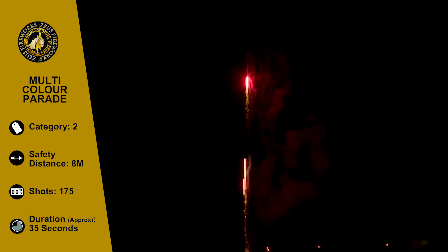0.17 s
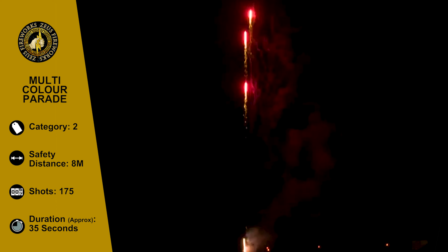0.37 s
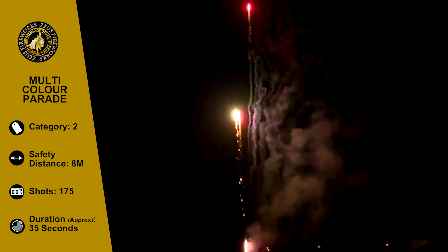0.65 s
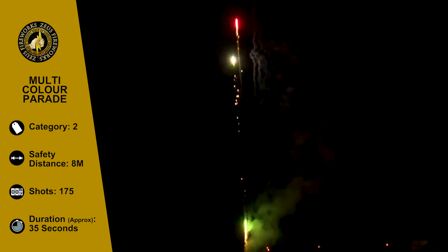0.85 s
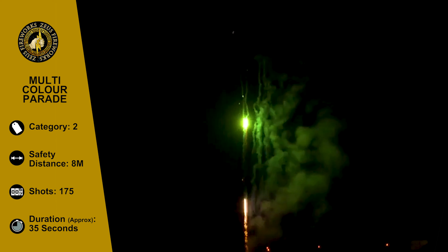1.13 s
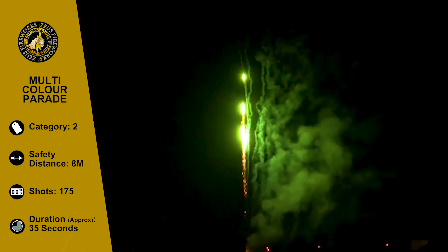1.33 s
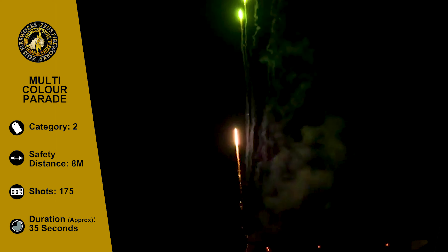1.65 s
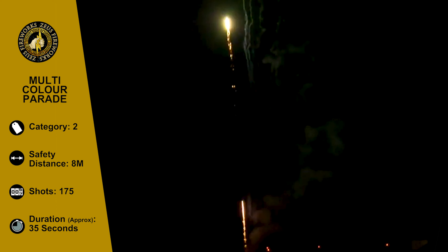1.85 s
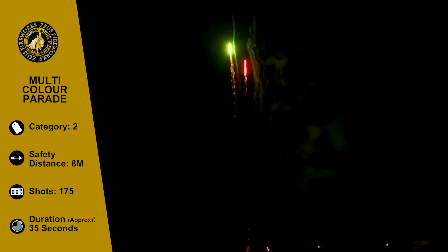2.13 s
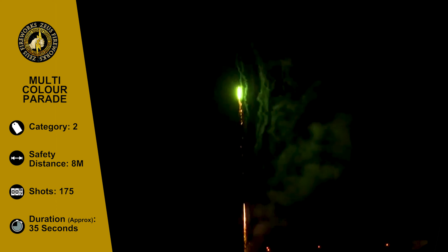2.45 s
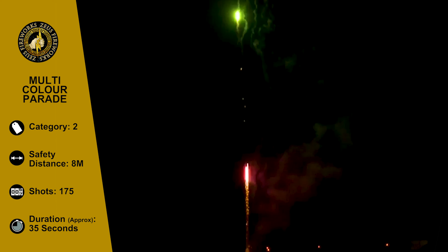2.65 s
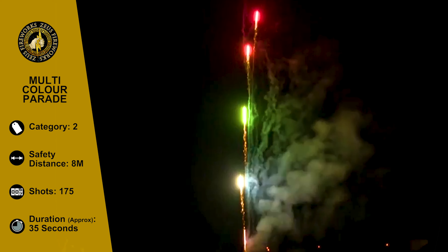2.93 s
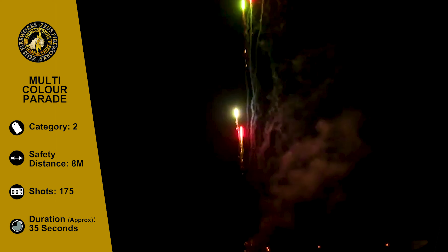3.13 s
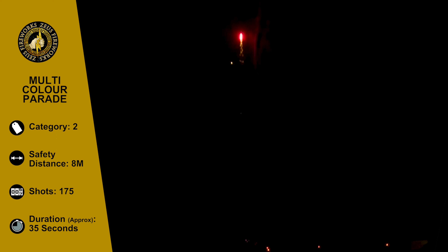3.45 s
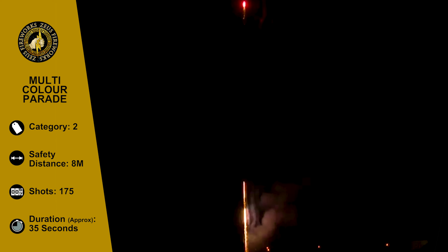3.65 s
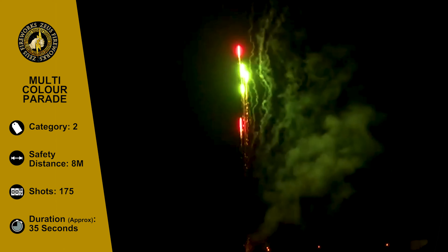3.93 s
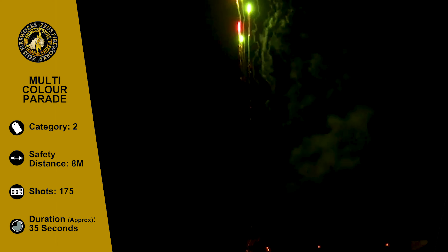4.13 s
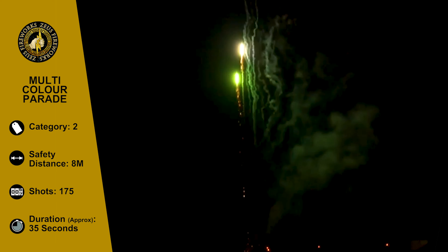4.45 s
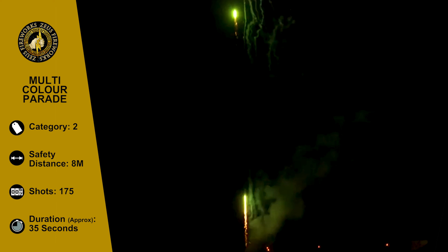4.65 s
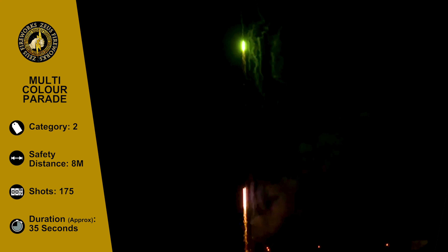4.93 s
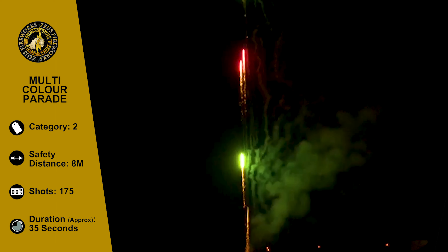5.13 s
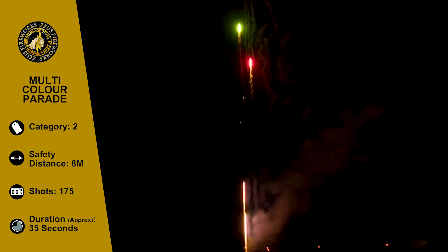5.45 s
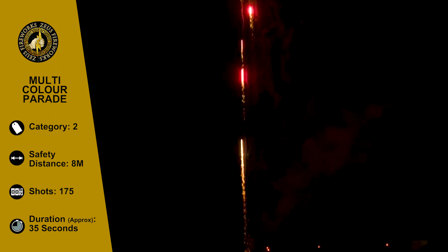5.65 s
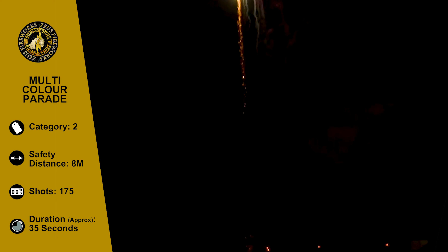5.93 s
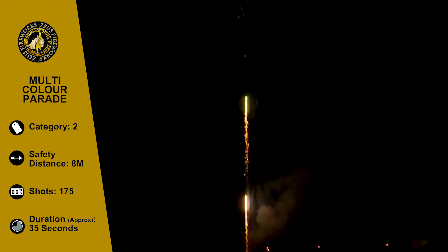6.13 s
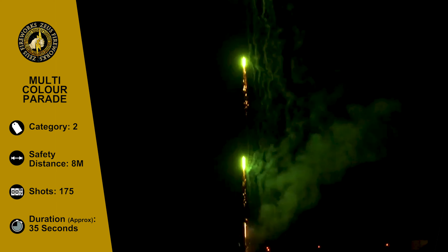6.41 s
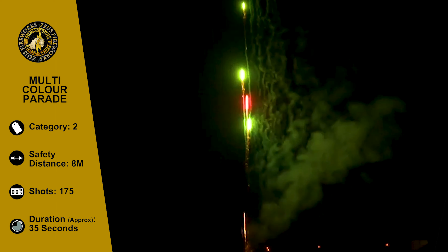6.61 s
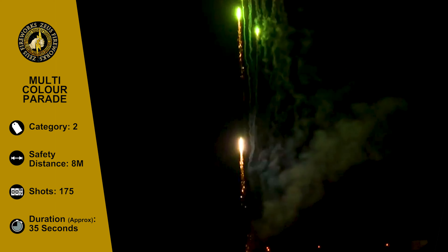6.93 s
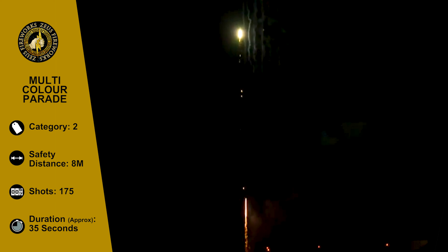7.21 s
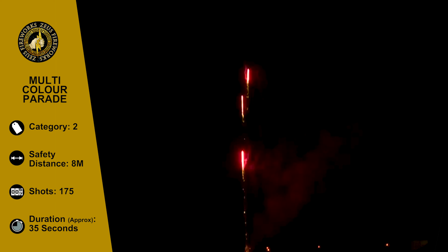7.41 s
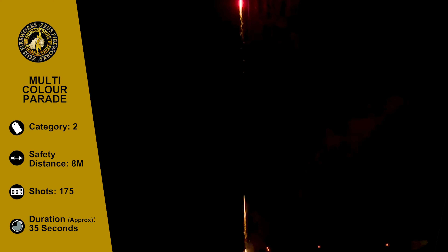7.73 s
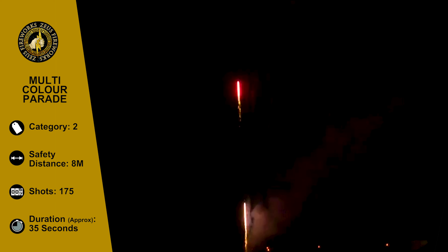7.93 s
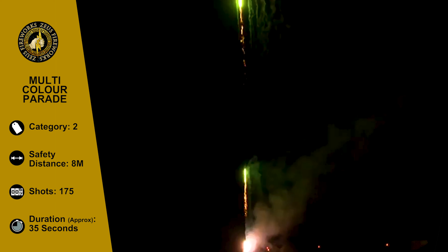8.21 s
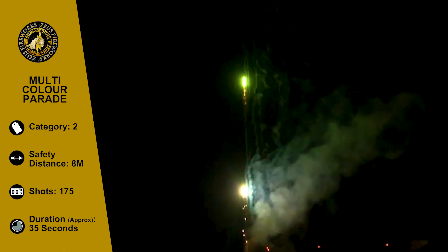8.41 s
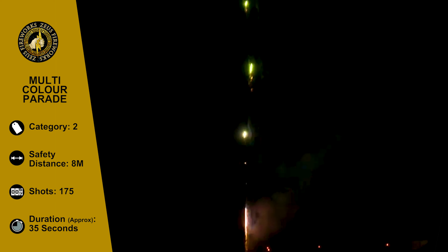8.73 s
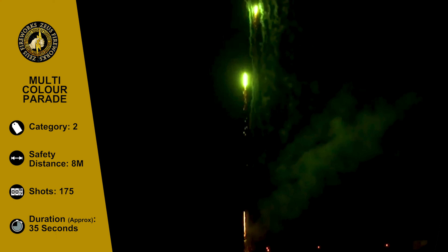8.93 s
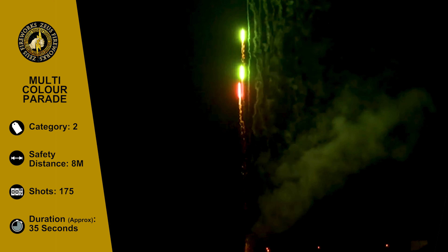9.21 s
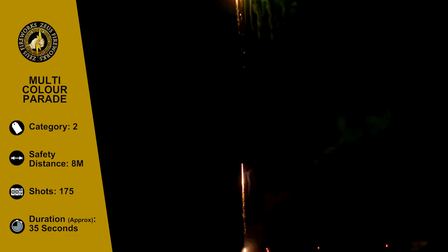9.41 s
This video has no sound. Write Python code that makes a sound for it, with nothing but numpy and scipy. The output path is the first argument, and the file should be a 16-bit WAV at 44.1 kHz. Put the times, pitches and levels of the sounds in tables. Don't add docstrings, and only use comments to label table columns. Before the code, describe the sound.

A bundle of roman candles fires some metres away in an open field at night. Sharp, dry pops come unevenly, singly, in pairs and in tight flurries, each with a split-second hiss of gas, a small low thump and a short hollow tube ring. Bright sparks sizzle after each shot while hedges and ground return a soft wash. Faint distant rumble and thin hiss lie beneath. Clear stereo, centred shots, wide echoes.

```python
import sys
import numpy as np
from scipy import signal
from scipy.fft import rfft, irfft, next_fast_len
from scipy.io import wavfile
from scipy.ndimage import uniform_filter1d, map_coordinates

SR = 44100
rng = np.random.default_rng(int(sys.argv[2]) if len(sys.argv) > 2 else 0)


def put_to_file(sound):
    columns = np.atleast_2d(sound).T
    safe = np.clip(columns, -1, 1)
    whole_steps = np.round(safe * 32767)
    wavfile.write(sys.argv[1], SR, whole_steps.astype(np.int16))


def nominal_scale(level):
    x = np.asarray(level, float) / 20
    return 10 ** x


N = 421596
LEAD = SR // 20

# pitch_hz, likeness (0-1)
NEAR = [(60, .998), (1500, .996), (4000, .96), (8000, .92), (14000, .75)]
# pitch_hz, likeness (0-1)
WIDE = [(60, .96), (200, 0.038), (550, 0.99), (1400, 0.93), (3100, 0.69), (6800, 0), (15000, 0)]


def candles():
    snaps = per_shot(snap, seconds=.06)
    jet, roar = gas_jet(), gas_roar()
    direct = snaps + per_shot(push, seconds=.07) + jet + roar + tube_ring()
    blast = .6 * roar.mean(axis=0) + .6 * snaps + .4 * jet.mean(axis=0)
    far = nominal_scale(-11) * far_echoes(blast) + scattered_sound()
    left_lag = 13e-6
    sides = np.array([[-1], [1]])
    placed = filtered(direct, lambda hz: np.exp(1j * np.pi * hz * left_lag * sides))
    return placed + star_sparks() + far


def shots():
    # start_s (the snap), leak_ms (before the snap), snap_db (peak), gas_db
    fired_shots = [(-0.009, 5.0, -14.5, -30.5), (0.1743, 8.6, -15, -36), (0.1887, 3, -13, -30.5),
                   (0.4524, 5.2, -16.5, -36.5), (0.5706, 4, -10.0, -29.5), (0.7339, 5.8, -16.5, -36),
                   (0.8798, 8.3, -25, -40), (1.152, 5.6, -22.0, -34), (1.2615, 4.6, -14.5, -31.5),
                   (1.295, 4.5, -13.5, -31.5), (1.6247, 4.14, -6.0, -28), (1.8977, 4.1, -12, -32),
                   (1.9961, 3.7, -11.0, -31.5), (2.3092, 4.8, -11.5, -31.5), (2.504, 6.1, -13.5, -32.0),
                   (2.6296, 5.4, -14.5, -36.5), (2.6635, 5.8, -10, -32.5), (2.8745, 9.7, -24.0, -36.5),
                   (2.8903, 3.7, -8.5, -28), (3.0028, 7.9, -13.5, -38), (3.6635, 5.7, -14.5, -34),
                   (3.6908, 8.1, -19.5, -33), (3.7387, 5.4, -17.0, -31.5), (3.7773, 4.5, -13, -31),
                   (3.8699, 8.4, -15.0, -35), (4.2535, 4.8, -9.5, -29), (4.7001, 8.7, -18, -33.5),
                   (4.9834, 10.6, -7.5, -28.5),
                   (5.1018, 6.5, -15, -34.5), (5.1721, 5.1, -16.5, -32.5), (5.5017, 3.9, -11, -26.5),
                  (5.5292, 8.5, -14, -37), (5.6377, 3.3, -9, -30.5), (6.0693, 5.05, -8, -29.5),
                  (6.1626, 9.1, -20.0, -37.0), (6.3556, 3.1, -45, -33.5), (6.473, 6.8, -19, -31.5),
                  (6.5319, 3.7, -11.0, -29.5), (6.6869, 3.9, -9.5, -30.5), (6.8625, 6.4, -15.5, -38.5),
                  (7.262, 5.9, -13.0, -34.5), (7.3648, 5.6, -10.5, -32.5), (7.4019, 7.2, -15, -34.5),
                  (7.77, 8.5, -15.5, -32), (7.8456, 4.4, -11.0, -27.5), (8.006, 2.7, -7.5, -28.5),
                  (8.1916, 4.3, -30, -35.5), (8.2512, 3.8, -28, -50), (8.4315, 3, -28, -35),
                  (8.7971, 7.5, -15.5, -35.5), (9.0023, 6, -13.5, -34.5), (9.0744, 3.8, -15.5, -28.5),
                  (9.1322, 4.6, -10.5, -34.5), (9.4391, 4.3, -11.5, -27.5), (9.5181, 8.3, -14.5, -36.5)]
    start_s, leak_ms, snap_db, gas_db = np.transpose(fired_shots)
    more_db, longer_ms = gas_db + 33, leak_ms - 5.5
    push_db = -29.3 + 0.68 * more_db + 0.18 * np.maximum(snap_db + 14, -12)
    jet_db = -34.5 + 1.3 * more_db + 0.21 * longer_ms
    roar_db = -35 + 0.84 * more_db - 0.22 * longer_ms
    return np.transpose([start_s, leak_ms, snap_db, push_db, jet_db, roar_db])


def snap(ms, leak_ms, snap_db, *_):
    # delay_ms, size (ratio)
    bounces = [
        (2, 0.041),
        (4.4, 0.067),
        (6, 0.035),
        (6.9, 0.09),
        (8.7, 0.058),
        (10.2, 0.1),
        (11.4, 0.089),
        (15.4, 0.022),
        (18.3, 0.026),
    ]
    width_ms = .036 + .006 * max(0, -17 - snap_db)
    spike = lobe(ms, 0, width_ms) + .5 * lobe(ms, .19, width_ms)
    suck = 0.2 * lobe(ms, 0.066, 0.098) - 0.38 * lobe(ms, 1.348, 0.14)
    near = 0
    for delay_ms, size in bounces:
        near = near + size * (lobe(ms, delay_ms, .14) - 0.15 * lobe(ms, delay_ms + 0.96, 0.6))
    return nominal_scale(snap_db - 3.0) * (spike + suck + 1.58 * near)


def push(ms, leak_ms, snap_db, push_db, *_):
    # delay_ms, width_ms, size (ratio)
    swing = [
        (1.5, .9, -1.35),
        (5.6, 1.9, .95),
        (9, 1.5, .2),
        (15, 3.5, -.15),
    ]
    heave = 0.98 * lobe(ms, 1.1 - leak_ms, 1.0) - 0.78 * lobe(ms, -.4 * leak_ms, 0.33 * leak_ms)
    gas_left = (3.6 / np.clip(leak_ms, 3, 12)) ** 0.38
    after = sum(size * lobe(ms, delay_ms, width_ms) for delay_ms, width_ms, size in swing)
    return nominal_scale(push_db + 2.0) * (heave + gas_left * after)


def gas_jet():
    # pitch_hz, level_db (per Hz)
    jet_colour = [(1500, -28), (2600, -12.5), (4400, -4.5), (5300, -1.5), (7700, -15), (9000, -8.5),
                  (11000, -12.5), (13000, -26), (15500, -26), (16200, -60)]

    def power(ms, leak_ms, snap_db, push_db, jet_db, roar_db):
        leaking = nominal_scale(2 * (jet_db + 2.0)) * gas_power(ms, leak_ms)
        burst = nominal_scale(2 * (snap_db - 12.5)) * fade(ms, rise_ms=0.056, t60_ms=5.6)
        return leaking + burst

    return np.sqrt(per_shot(power, seconds=.08)) * rush(jet_colour, NEAR, patchy_db=1.5)


def gas_roar():
    # pitch_hz, level_db (per Hz)
    roar_colour = [(200, -27), (450, -8), (700, -1.5), (1100, -2), (1900, 1), (2600, -13), (4000, -8),
                   (6500, -14), (10000, -57)]

    def power(ms, leak_ms, snap_db, push_db, jet_db, roar_db):
        return nominal_scale(2 * roar_db) * gas_power(ms, leak_ms)

    return np.sqrt(per_shot(power, seconds=.08)) * rush(roar_colour, NEAR, patchy_db=2.0)


def gas_power(ms, leak_ms):
    since_leak = ms + leak_ms
    growth = np.clip(since_leak / 4.37, 0, 1) ** 1.58
    sag_db = 120 * np.maximum(since_leak - 4.2, 0) / 70
    open_db = 120 * np.maximum(ms - 1.8, 0) / 28
    return growth * nominal_scale(-sag_db - open_db)


def tube_ring():
    # pitch_hz, level_db (per Hz)
    tube_colour = [(120, -41), (200, 13.5), (328, 2), (1060, 9), (1710, -2), (2020, 4.5), (4040, -2.5),
                   (4860, -19), (6880, -3.5), (11500, -64), (16000, -47)]

    def power(leak_ms, snap_db, push_db, jet_db, roar_db):
        return nominal_scale(push_db + roar_db - 3.5)

    ringing = after_shots(power, delay_ms=0, rise_ms=3.6, t60_ms=76)
    return ringing * rush(tube_colour, NEAR, patchy_db=0)


def star_sparks():
    # pitch_hz, level_db (per Hz)
    spark_colour = [(1000, -34), (2500, -11), (5000, -6), (8000, -8), (11000, -15.5), (13000, -20),
                    (15600, -28), (16200, -60)]

    def power(leak_ms, snap_db, push_db, jet_db, roar_db):
        return nominal_scale(jet_db + roar_db - 47.0)

    burning = after_shots(power, delay_ms=3.7, rise_ms=5, t60_ms=930)
    return burning * rush(spark_colour, WIDE, patchy_db=-4.0)


def scattered_sound():
    # pitch_hz, level_db (per Hz)
    scatter_colour = [(200, -40), (350, -21), (650, -6), (1000, -4), (1600, 0), (3000, -8.5), (5300, -10),
                      (8000, -16), (12000, -36)]

    def power(leak_ms, snap_db, push_db, jet_db, roar_db):
        return nominal_scale(1.203 * roar_db + 0.82 * push_db - 44.5)

    wash = after_shots(power, delay_ms=20, rise_ms=37, t60_ms=1280)
    return wash * rush(scatter_colour, WIDE, patchy_db=3.0)


def far_echoes(blast):
    # pitch_hz, level_db
    echo_colour = [(200, -17), (350, -5), (650, -0.5), (1000, 0), (1600, -2.5), (3000, 8), (5300, -2.5),
                   (8000, -1), (12000, -20)]
    # pitch_hz, fade_s
    echo_fade = [(300, 0.87), (1000, 1.97), (3000, 1.07), (8000, 1.01)]
    noise = rush(echo_colour, WIDE, patchy_db=3.0)[:, :3 * SR // 2]
    hz, t, z = signal.stft(noise, SR, nperseg=256)
    rise = 1 - np.exp(-np.maximum(t - .012, 0) / 0.022)
    fall = nominal_scale(-60 * t / along(echo_fade, hz)[:, None])
    tail = signal.istft(z * rise * fall, SR, nperseg=256)[1]
    tail = tail / np.linalg.norm(tail[0])
    before = nominal_scale(-29) * rng.standard_normal(N) * (np.arange(N) < SR // 200)
    return signal.fftconvolve((blast + before)[None], tail, axes=1)[:, :N]


def night():
    # pitch_hz, level_db (per Hz)
    rumble_colour = [(15, -45), (30, 4), (70, -4), (110, 0.5), (150, -6), (220, -10.5), (320, -24),
                     (600, -18.5), (1000, -21.5), (1600, -62), (3000, -56)]
    # pitch_hz, level_db (per Hz)
    hiss_colour = [(300, 10.5), (1500, -3), (6000, -2), (10000, -3.5), (13000, -11.5), (15600, -16),
                   (16200, -50)]
    # pitch_hz, likeness (0-1)
    far_likeness = [(60, 1), (240, 0.81), (950, 0.93), (3770, 0.78), (15000, 0.37)]
    lumps_db = wander(11)
    swells_db = 1.15 * wander(2.42)
    rumble = nominal_scale(-51.5 + swells_db + lumps_db) * rush(rumble_colour, far_likeness, patchy_db=1.25)
    return rumble + nominal_scale(-62.0) * rush(hiss_colour, far_likeness, patchy_db=2.0)


def wander(per_second):
    return map_coordinates(rng.standard_normal(120), [np.arange(N) * per_second / SR])


def per_shot(shape, seconds):
    out = np.zeros(N + LEAD + 2 * SR)
    for start_s, *row in shots():
        at = np.arange(round(seconds * SR)) + round(start_s * SR) + LEAD // 2
        ms = (at - LEAD) / SR * 1000 - start_s * 1000
        out[at] += shape(ms, *row)
    return out[LEAD:LEAD + N]


def after_shots(power, delay_ms, rise_ms, t60_ms):
    strikes = np.zeros(N + LEAD)
    for start_s, *row in shots():
        strikes[round(start_s * SR) + LEAD] = power(*row)
    ms = np.arange(3 * SR // 2) / SR * 1000
    shape = fade(ms - delay_ms, rise_ms, t60_ms)
    return np.sqrt(np.abs(signal.fftconvolve(strikes, shape)[LEAD:LEAD + N]))


def lobe(ms, centre_ms, width_ms):
    return np.exp(-.5 * ((ms - centre_ms) / width_ms) ** 2)


def fade(ms, rise_ms, t60_ms):
    ms = np.maximum(ms, 0)
    return (1 - np.exp(-ms / rise_ms)) ** 2 * nominal_scale(-120 * ms / t60_ms)


def rush(colour, alike, patchy_db):
    z = signal.stft(rng.standard_normal((2, N)), nperseg=256)[2]
    patches = uniform_filter1d(rng.standard_normal(z.shape[1:]), size=3, axis=0)
    patches = uniform_filter1d(patches, size=8, axis=1)
    pair = signal.istft(z * nominal_scale(patchy_db * unit(patches)), nperseg=256)[1][:, :N]

    def response(hz):
        turn = np.arccos(np.clip(along(alike, hz), -1, 1)) / 2
        return nominal_scale(along(colour, hz)) * [np.cos(turn), np.sin(turn)]

    mid, side = filtered(pair, response)
    return unit(np.array([mid + side, mid - side]))


def unit(x):
    return x / np.sqrt(np.mean(x ** 2) + 1e-20)


def along(points, hz):
    f, v = np.transpose(points)
    return np.interp(np.log(hz + 1), np.log(f + 1), v)


def filtered(x, response):
    m = next_fast_len(N + SR // 4)
    return irfft(rfft(x, m) * response(np.fft.rfftfreq(m, 1 / SR)), m)[..., :N]


def scene():
    return candles() + night()


def band_limit(x):
    return signal.sosfilt(signal.butter(12, 16640, fs=SR, output="sos"), x)


def record(dry):
    # pitch_hz, left_minus_right_db
    balance = [(60, -1), (180, -.9), (400, -.3), (1000, 0), (5000, -.5), (10000, .4)]

    def colour(hz):
        sides = nominal_scale(along(balance, hz) * [[.5], [-.5]])
        bass_cut = hz ** 2 / (hz ** 2 + 38 ** 2)
        return sides * bass_cut * (hz < 15950)

    return band_limit(filtered(dry, colour))


dry = scene()
out = record(dry)
put_to_file(out)
```